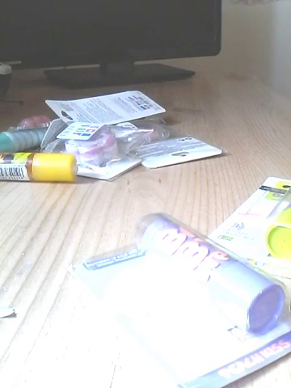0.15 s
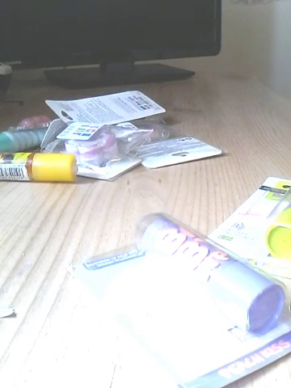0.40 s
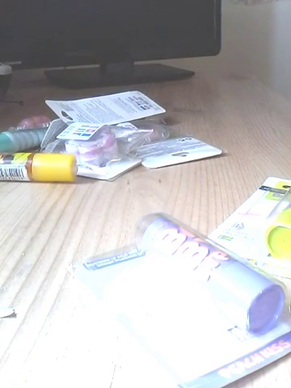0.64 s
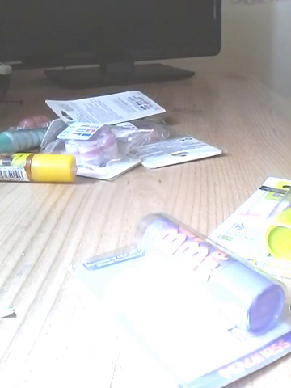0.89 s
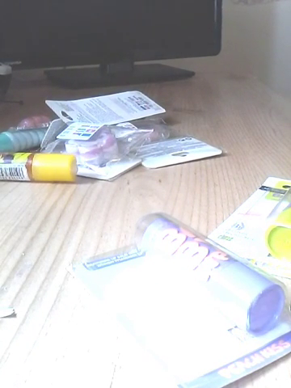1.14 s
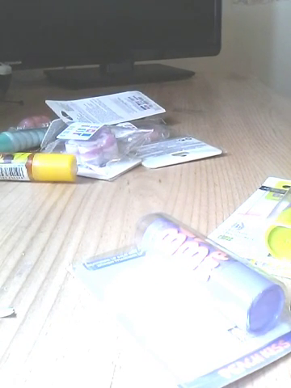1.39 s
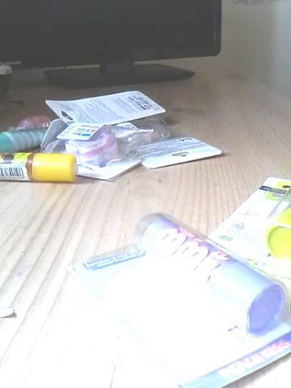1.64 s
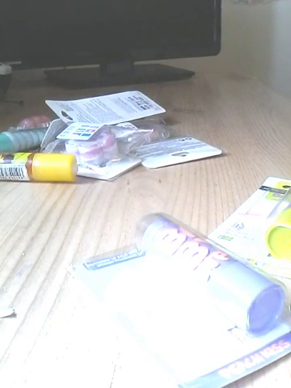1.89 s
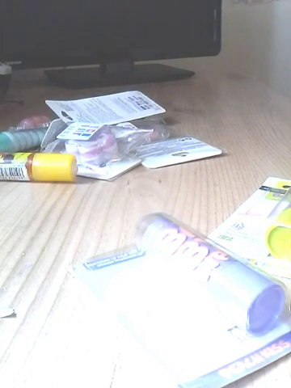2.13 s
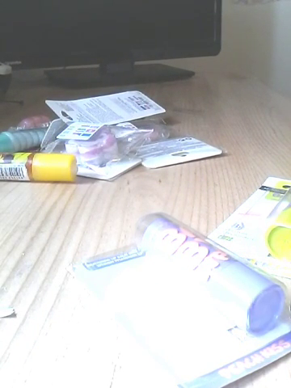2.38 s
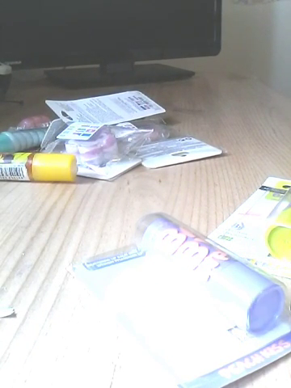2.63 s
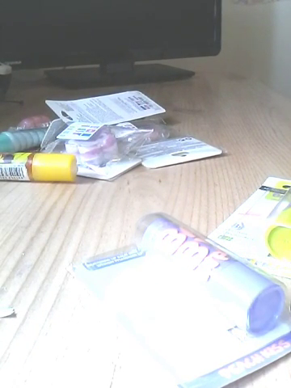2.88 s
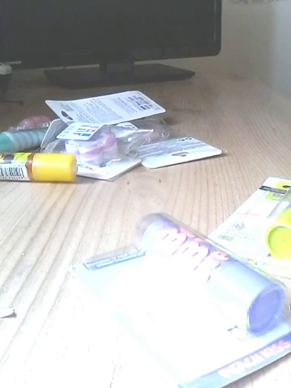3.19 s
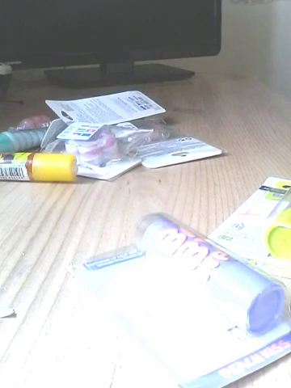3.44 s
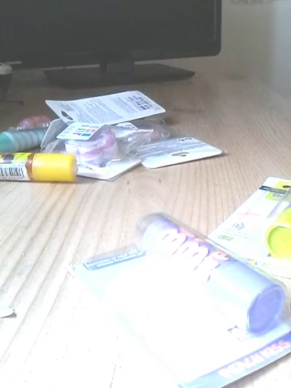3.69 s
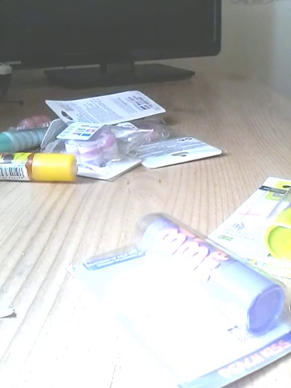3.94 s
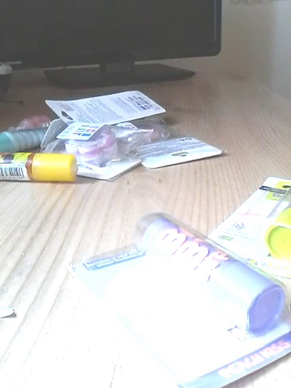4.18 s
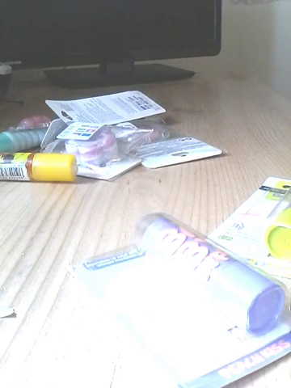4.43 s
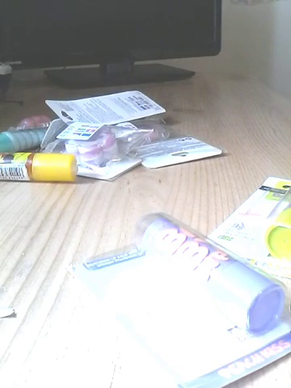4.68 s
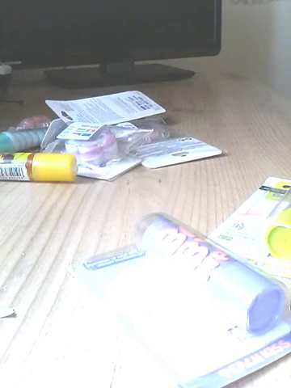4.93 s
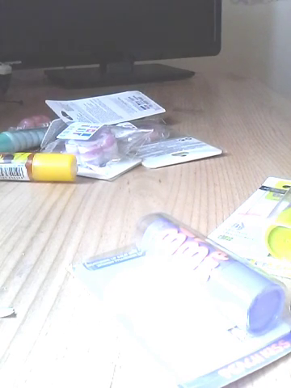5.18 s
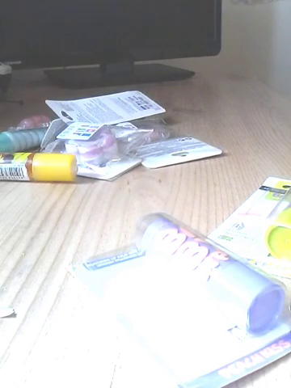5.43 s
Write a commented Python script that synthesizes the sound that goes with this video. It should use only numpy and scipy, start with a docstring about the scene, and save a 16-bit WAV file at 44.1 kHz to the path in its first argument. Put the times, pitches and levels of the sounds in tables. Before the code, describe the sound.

Stiff plastic and card packaging is handled close to the microphone on a wooden table. Crisp crinkles and low scrapes lead to a loud hollow knock at about one second. Bright snaps follow in clusters, thin out to near silence around four seconds, then a soft bump and more crackles end it. Small quiet room, short echoes.

```python
"""Blister packs on a wooden table

Stiff plastic blister packs on card are handled and pushed over a hollow wooden table, heard close up.
The plastic crinkles in clumps of tiny clicks with ringing hollows; short rattles make snaps and foil ticks.
Friction grains and soft strikes make the table top ring; short echoes and quiet room noise lie around it."""
import sys
import numpy as np
from scipy import signal
from scipy.fft import rfft, irfft
from scipy.io import wavfile

SR = 44100
rng = np.random.default_rng(int(sys.argv[2]) if len(sys.argv) > 2 else 0)


def nominal_scale(level):
    """Amplitude ratio for a level in decibels (scalar or array-like)."""
    x = np.asarray(level, float) / 20
    return 10 ** x


def int16_out(signal):
    """Quantize to a 16-bit WAV file."""
    q = np.round(np.clip(np.atleast_2d(signal).T, -1, 1) * 32767)
    wavfile.write(sys.argv[1], SR, q.astype(np.int16))


N = 245460   # length in samples

# knocks on the table: t/s, peak level/dB, strongest ring f/Hz, reach/octaves
KNOCK_EVENTS = [(.279, -36, 1200, 1.6), (0.648, -27.5, 219, 1.1), (0.912, -22, 201.5, 0.55),
                (.960, -25.5, 950, 0.62), (0.9621, -9.5, 530, 0.93), (0.9663, -6.5, 522, 0.7),
                (.967, -17, 145, 0.9), (.971, -13, 302, 0.94), (0.99, -15, 590, 5.2),
                (1.028, -22, 215, 0.77), (1.040, -19.5, 730, 0.5), (1.51, -38.5, 240, 1.2),
                (3.991, -54.5, 230, 1.12), (4.491, -53.5, 738, 0.92), (4.592, -30, 364, 0.35),
                (4.602, -29.5, 148, 1.1), (5.042, -23.5, 553, 1.1), (5.072, -24, 570, 0.7),
                (5.096, -30, 560, 0.53), (5.114, -37, 580, 1.3)]
# ringing modes of table top and card: f/Hz, relative level/dB, nominal 60 dB decay/s (each use scales it)
TABLE_MODES = [(113.8, -26.5, 0.15), (145, 4, 0.11), (229.8, 2, 0.066), (251.8, -3, 0.12), (344, 8, 0.041),
               (396.7, 2, 0.07), (522, 0.5, 0.061), (560, 11.5, 0.016), (772, -7, 0.24),
               (1060, -1.5, 0.0401), (1270, 2.5, 0.033), (1630, -24.5, 0.037)]
# tone colour of the stiff plastic: f/Hz, relative level/dB
PLASTIC_COLOUR = [(290, -48.5), (500, -21.5), (804, -7), (1270, -5), (1430, -22.5), (1630, -13.5),
                  (2140, -10), (2360, -4.5), (2850, -4.5), (4260, -12), (5130, -1), (6100, -4), (9120, -31),
                  (11300, -45), (15500, -57.5)]


def rms_one(x):
    """Scales a sound to an rms of 1."""
    return x / np.sqrt(np.mean(x ** 2) + 1e-20)


def in_time(rows, rise_db_per_s, fall_db_per_s, rest_db):
    """Each gesture swells, holds and fades; its other columns count as much as it sounds."""
    t = np.arange(0, N + 64, 64) / SR
    start, hold, db, *columns = np.transpose(rows)[:, :, None]
    # a gesture that opens within 12 ms of a knock starts almost at once
    jolted = np.abs(start - np.array(KNOCK_EVENTS)[:, 0]).min(1, keepdims=True) < .012
    rise = np.where(jolted, 2001.5, rise_db_per_s)
    level = db - rise * np.maximum(start - t, 0) - fall_db_per_s * np.maximum(t - start - hold, 0)
    power = nominal_scale(2 * np.maximum(level, -200))
    rest = nominal_scale(2 * rest_db)
    total = power.sum(0) + rest
    curves = [10 * np.log10(total)]
    for column in columns:
        curves.append(((column * power).sum(0) + np.median(column) * rest) / total)
    return [np.interp(np.arange(N) / SR, t, curve) for curve in curves]


def drift(rate_hz):
    """Slow random wander with an rms of 1: noise through a two-pole low-pass."""
    r = np.exp(-2 * np.pi * rate_hz / SR)
    noise = rng.standard_normal(N + SR)
    return rms_one(signal.lfilter([1], [1, -2 * r, r * r], noise)[SR:])   # skip the filter's start


def colour(x, spectrum):
    """Minimum-phase filter that follows a spectrum, so that nothing sounds early."""
    size = 4096
    hz, db = np.transpose(spectrum)
    grid = np.maximum(np.arange(size // 2 + 1), 1) * SR / size
    cepstrum = irfft(np.log(nominal_scale(np.interp(np.log(grid), np.log(hz), db))))
    # folding the cepstrum onto its first half gives minimum phase
    cepstrum[1:size // 2] *= 2
    cepstrum[size // 2 + 1:] = 0
    return signal.fftconvolve(x, irfft(np.exp(rfft(cepstrum))))[:N]


def ring(force, hz, t60):
    """A unit click sets a sine of height 1 ringing; it fades by 60 dB in t60 seconds."""
    r, w = nominal_scale(-60 / (t60 * SR)), 2 * np.pi * hz / SR
    return signal.lfilter([0, np.sin(w)], [1, -2 * r * np.cos(w), r * r], force + 1e-18)


def grains(per_s, spread_db, clump_db, clump_rate_hz):
    """Random clicks of uneven size that come in clumps; rms 1."""
    clumps = nominal_scale(clump_db * drift(clump_rate_hz))
    sizes = nominal_scale(spread_db * np.minimum(rng.exponential(1, N), 5)) * rng.choice([-1, 1], N)
    clicks = rng.random(N) < per_s / SR
    return rms_one(sizes * clumps * clicks)


def room_tone():
    """The quiet room: steady noise shaped by its spectrum."""
    # colour of the room noise: f/Hz, relative level/dB
    room_colour = [(18, -36), (30, 2.5), (108, 6.5), (187, 2.5), (316, 1.5), (432, -4), (547, 3.5),
                   (1520, -8.5), (5600, -17.5), (8290, -23), (15500, -24)]
    rms_db = -68.5
    return nominal_scale(rms_db) * rms_one(colour(rng.standard_normal(N), room_colour))


def echoes(x):
    """Near surfaces give back a short dense tail, here fading noise."""
    level_db, t60_s = -11, .15
    t = np.arange(round(.25 * SR)) / SR
    tail = rng.standard_normal(len(t)) * nominal_scale(-60 * t / t60_s) * (t > .002)
    return nominal_scale(level_db) * signal.fftconvolve(x, tail / np.sqrt(np.sum(tail ** 2)))[:N]


def drag():
    """Friction shakes the table modes: the low one nearest the push's pitch hums, the upper by its share."""
    # pushes of the card: t/s, hold/s, rumble level/dB (lowered below for each group of modes),
    # share of upper modes level/dB, strongest low mode f/Hz
    pushes = [(.27, 0.024, -47.5, 2, 175), (.53, 0.015, -31.5, -6, 178), (.6, 0.007, -37.5, -13, 159),
              (.65, 0.17, -36, -0.5, 170), (.75, 0.038, -52, 8, 200), (.81, 0.091, -33.5, -1.5, 187),
              (.9, 0.091, -25.5, -2, 204), (.965, 0.013, -16.5, 9.5, 190), (1.02, 0.038, -33, 6.5, 230),
              (1.1, .04, -45.5, 3, 240), (1.24, 0.19, -37, -0.5, 208), (1.51, 0.018, -29, -12.5, 203),
              (1.58, 0.05, -42, -7, 207), (1.68, 0.024, -61, 0, 206), (1.86, 0.03, -43.5, -26, 159),
              (2.08, 0.028, -43, -1.5, 208), (2.32, 0.048, -54.5, 2.5, 170), (2.46, 0.017, -61, 8, 232),
              (2.74, 0.063, -54, -9, 172), (2.87, 0.064, -53, -20, 151), (3.18, 0.026, -61, 3.5, 206),
              (3.31, 0.067, -59, 2, 150), (3.93, .08, -70.5, 9, 194), (4.59, 0.038, -28, -5, 165.1),
              (4.65, 0.046, -39, -7.5, 170), (4.72, 0.052, -48.5, -13, 172), (4.86, .07, -49.5, -2, 176),
              (5.04, .02, -32.5, -0.5, 186), (5.08, 0.018, -41, 1.5, 189), (5.22, .07, -44, -12, 155),
              (5.34, 0.088, -44, -4, 184), (5.54, 0.023, -66, 13, 238)]
    rumble_db, upper_db, hum_hz = in_time(pushes, rise_db_per_s=344.5, fall_db_per_s=300.0, rest_db=-77)
    rub = grains(per_s=2500, spread_db=5.5, clump_db=2.0, clump_rate_hz=28)
    low, upper = 0, 0
    for hz, db, t60 in TABLE_MODES:
        if hz < 300:
            octaves_off = abs(np.log2(hz / hum_hz))
            near = nominal_scale(rumble_db - 3.5 - 30.0 * octaves_off)
            low = low + near * rms_one(ring(ring(rub, hz, 2.2 * t60), hz, 0.2 * t60))
        else:
            # longer and higher rings are scaled down
            upper = upper + nominal_scale(db) * ring(ring(rub, hz, 1.2 * t60), hz, 0.23 * t60) / (hz * t60)
    return low + nominal_scale(rumble_db + upper_db - 8.5) * rms_one(upper)


def knocks():
    """Each soft contact strikes all table modes, most those near its own ring; a resting hand damps them."""
    ring_share = .75   # share of the nominal decay time left under the hand
    landing_s, landing_rough = .004, .05   # fade time and size of the uneven force
    out, size = np.zeros(N), round(.3 * SR)
    t = np.arange(size) / SR
    chance = rng.standard_normal((len(KNOCK_EVENTS), size))
    for (s, peak_db, ring_hz, octaves), rough in zip(KNOCK_EVENTS, chance):
        push = t * ring_hz * np.exp(-6.0 * t * ring_hz)   # one soft push, short for a high ring
        landing = landing_rough * rough * np.exp(-t / landing_s)
        # the contact spot couples to modes near its ring
        band = [ring_hz / 2 ** octaves, ring_hz * 2 ** octaves]
        reach = signal.butter(2, band, "band", fs=SR, output="sos")
        force = signal.sosfilt(reach, push + landing)
        sound = 0
        for hz, db, t60 in TABLE_MODES:
            gain = nominal_scale(db - 20 * abs(np.log2(hz / ring_hz)) / octaves)
            sound = sound + gain * ring(force, hz, ring_share * t60)
        at = round(s * SR)
        out[at:at + size] += (nominal_scale(peak_db) * sound / np.abs(sound).max())[:N - at]
    return out


def handling():
    """The hand squeezes and shifts the packs: crinkle level, card share and foil share over time."""
    # squeezes: t/s, hold/s, crinkle level/dB, card rustle level/dB above it, foil sheen level/dB above it
    # (the crinkle uses both shares only as swings around their middle value)
    squeezes = [(0.0, .04, -51, -14.5, -21.5), (.07, .06, -62, -21.5, -28.5),
                (.17, 0.17, -47.5, -11, -28.5), (.3, 0.069, -49, 1, -33.5), (.4, .04, -47, -9, -23),
                (.46, .04, -46.5, -3.5, -26.5), (.53, .04, -51, -12.5, -32), (.6, .1, -40, -13.5, -13),
                (.74, 0.12, -50, -2, -15), (.87, 0.078, -48.5, 15, -38), (.958, 0.036, -30.5, 8.5, -19.5),
                (1.02, .05, -40, 5.5, -6), (1.09, .03, -47, 2, -17.5), (1.14, .05, -50, -5, -7.5),
                (1.25, .17, -53.5, 10, 0), (1.45, 0.088, -45, -9.5, -13), (1.59, .06, -58, -12, -15),
                (1.78, 0.13, -45.5, -9.5, -19), (1.93, 0.061, -39.5, -9.5, -7), (2.05, .09, -39, -8, -8),
                (2.2, .06, -61, -20.5, -26), (2.29, 0.018, -43.5, -10, -18.5),
                (2.38, 0.068, -42.5, -10, -11), (2.49, .17, -47, -15.5, -31),
                (2.68, 0.016, -51, -25, -12.5), (2.73, .06, -38, -17, -18), (2.81, 0.044, -37.5, -7.5, -6),
                (2.88, .05, -44.5, -10.5, -22), (2.95, .04, -51, -7, -23.5), (3.02, .05, -55, -11, -18.5),
                (3.09, .04, -66.5, -11.5, -22), (3.16, 0.042, -56.5, -3.5, -15.5),
                (3.25, .14, -47, -7.5, -19.5), (3.42, 0.093, -56.5, -9, -21), (3.56, .12, -71, -5.5, -25.5),
                (3.72, .09, -62, -4, -16.5), (3.85, .2, -65.5, -3.5, -24), (4.07, .07, -69.5, -5.5, -21),
                (4.24, 0.46, -73, -5.5, -21.5), (4.5, 0.19, -57.5, -6, -18), (4.61, .15, -41, -11.5, -11.5),
                (4.79, .03, -52, -7.5, -28.5), (4.87, .06, -46.5, -10, -24), (4.95, .03, -62, -9.5, -31),
                (5.04, 0.041, -53.5, 2.5, -29), (5.09, 0.0236, -53.5, 3, -22),
                (5.19, .01, -56.5, -8, -18.5), (5.23, .15, -41.5, -7, -15.5),
                (5.43, .14, -41.5, -7.5, -28.5)]
    # the packs still settle at rest
    return in_time(squeezes, rise_db_per_s=307, fall_db_per_s=290.0, rest_db=-76.0)


def small_snaps(count, strength_db, centre_hz):
    """Random rows like those of the loud snaps and ticks, as strong as the handling at their moment."""
    s = rng.uniform(.01, N / SR - .01, count)
    size, pitch = rng.standard_normal((2, count))
    db = strength_db[(s * SR).astype(int)] + 3.0 * size   # spread 3 dB
    return list(zip(s, db, centre_hz * 2 ** (.2 * pitch)))   # spread 0.2 octaves


def rattles(events, spectrum, fast_s, slow_s, cycles, broad):
    """A snap is a short rattle of the sheet: a brief ring at its own pitch and a broad crack."""
    size = 1024
    t, out = np.arange(size) / SR, np.zeros(N + size)
    swell = (t / .003) ** 3 / (1 + (t / .003) ** 3)   # the fold creaks up to its break
    shape = swell * (np.exp(-t / fast_s) + 0.11 * np.exp(-t / slow_s))
    for (s, strength_db, hz), noise in zip(events, rng.standard_normal((len(events), size))):
        tone = ring(ring(noise * shape, hz, cycles / hz), hz, 1.0 / hz)
        crack = colour(noise * shape, spectrum)[:size]
        small_fold = signal.butter(1, 0.9 * hz, "high", fs=SR, output="sos")   # small folds lack depth
        crack = signal.sosfilt(small_fold, crack)
        burst = tone / np.abs(tone).max() + broad * crack / np.abs(crack).max()
        at = round((s - .002) * SR)   # the swell leads up to the event
        out[at:at + size] += nominal_scale(strength_db - 5.0) * burst / np.abs(burst).max()
    return out[:N]


def snaps():
    """The stiff sheet snaps in the presence range, the thin foil ticks above it."""
    # loud plastic snaps: t/s, strength level/dB (peak lies 5 dB lower before the filter), pitch f/Hz
    loud_snaps = [(0.1535, -32.5, 4200), (0.2673, -32, 5330), (0.408, -24.5, 5000), (0.4563, -25, 5630),
                  (0.4868, -24, 5840), (0.5642, -25.5, 5950), (0.5924, -25, 5000), (0.6285, -22, 5020),
                  (0.669, -16, 5300), (0.6992, -39, 4820), (0.752, -25.5, 5340), (0.7746, -25, 5650),
                  (0.7904, -24, 6080), (0.8061, -22.5, 5800), (0.831, -25.5, 5100), (0.883, -28, 1510),
                  (0.9572, -12, 2140), (1.0587, -24, 5250), (1.1358, -33, 5400), (1.1493, -26.5, 5200),
                  (1.168, -16.5, 5040), (1.1867, -23, 4970), (1.2665, -29, 5050), (1.406, -37, 5760),
                  (1.4198, -23, 6050), (1.48, -35, 5700), (1.5199, -20, 5650), (1.719, -38, 3490),
                  (1.7509, -53.5, 5300), (1.7664, -32, 5200), (1.7918, -26, 5770), (1.8537, -27, 2390),
                  (1.8985, -21, 6230), (1.931, -22, 1860), (1.955, -22.5, 5040), (1.9924, -33, 5390),
                  (2.0123, -21, 5100), (2.0613, -15, 6050), (2.1041, -18.5, 5450), (2.2233, -33, 5000),
                  (2.3364, -24, 5200), (2.4095, -15.5, 5570), (2.4409, -30, 2360), (2.546, -26, 5130),
                  (2.5646, -38, 5140), (2.599, -25.5, 5070), (2.6564, -32, 5120), (2.679, -24.5, 6020),
                  (2.715, -30, 5900), (2.7276, -19.5, 5340), (2.7655, -19.5, 5330), (2.822, -15, 5250),
                  (2.8462, -13, 5500), (2.9746, -27, 5300), (3.026, -28.5, 6000), (3.0552, -33, 2450),
                  (3.153, -36.5, 3020), (3.249, -32.5, 5000), (3.2515, -18, 4550), (3.2842, -19, 5260),
                  (3.3049, -30, 3960), (3.3176, -20, 5250), (3.5015, -26.5, 5410), (3.5197, -35, 5240),
                  (3.6795, -44.5, 4890), (3.7623, -49.5, 5940), (3.7634, -25, 6253), (4.569, -35, 6130),
                  (4.6044, -25, 6000), (4.6086, -29, 5360), (4.7212, -45, 5900), (4.7561, -29, 5350),
                  (4.83, -28.5, 5330), (4.8783, -26.5, 5400), (4.9077, -28.5, 5980), (5.0365, -44.5, 5950),
                  (5.05, -29.5, 5570), (5.0943, -29, 1890), (5.212, -34, 6020), (5.2195, -28, 5390),
                  (5.3485, -20, 6200), (5.4005, -23.5, 4750), (5.433, -25, 6030), (5.4565, -28, 2320)]
    # thin-foil ticks, same columns: t/s, strength level/dB, pitch f/Hz
    loud_ticks = [(0.156, -50, 9370), (0.4095, -43, 8300), (0.5646, -63, 8420), (0.5876, -46, 8400),
                  (0.6165, -36.5, 8460), (0.627, -34, 8200), (0.6978, -51.5, 9400), (0.7513, -53.5, 9400),
                  (0.8819, -54.5, 9140), (0.9642, -46, 8300), (1.06, -35, 8900), (1.1353, -43, 9770),
                  (1.1642, -36, 10400), (1.2276, -47, 10200), (1.265, -40, 10600), (1.286, -39.5, 9550),
                  (1.296, -37, 9700), (1.3314, -38.5, 10000), (1.479, -33.5, 8700), (1.717, -49, 8260),
                  (1.7509, -65, 9210), (1.956, -33, 10200), (1.995, -31, 8200), (2.0527, -63, 8910),
                  (2.0657, -28, 8100), (2.1894, -58, 8850), (2.2992, -42.5, 11200), (2.406, -38, 10670),
                  (2.5446, -51, 10500), (2.679, -38, 10400), (2.7192, -42.5, 8590), (2.845, -37, 11100),
                  (2.9744, -64.5, 8480), (3.24, -64, 8450), (3.2525, -48, 11200), (3.2847, -42.5, 9780),
                  (3.7623, -68, 8250), (4.6034, -38, 8200), (4.609, -34.5, 8300), (4.7566, -53, 8700),
                  (5.188, -45, 8330), (5.3453, -31, 8400)]
    # tone colour of the foil: f/Hz, relative level/dB
    foil_colour = [(4120, -35.5), (7000, -4), (8160, -11.5), (9480, -9.5), (11400, -19), (13700, -14),
                   (15500, -36.5)]
    level_db, _, sheen_db = handling()
    sheen_db = 0.39 * (sheen_db - np.median(sheen_db))   # small ticks follow part of the sheen's swing
    stiff_events = [*loud_snaps, *small_snaps(330, level_db + 14.0, 5400.0)]
    foil_events = [*loud_ticks, *small_snaps(300, level_db + sheen_db - 10, 9500)]
    stiff = rattles(stiff_events, PLASTIC_COLOUR, fast_s=.0015, slow_s=0.0033, cycles=26.0, broad=.55)
    foil = rattles(foil_events, foil_colour, fast_s=0.00022, slow_s=0.0061, cycles=40.0, broad=0.53)
    dull = signal.butter(3, [700, 7500], "band", fs=SR, output="sos")
    bright = signal.butter(3, 7800, "high", fs=SR, output="sos")
    return signal.sosfilt(dull, stiff) + signal.sosfilt(bright, foil)


def hollow_rings(buckles, card_db, sheen_db):
    """Tiny buckles set the hollows of blisters and card ringing; the grip picks which low one sounds."""
    # hollows: f/Hz, nominal width/Hz (sets the decay times), relative level/dB
    hollows = [(943, 220, -4.5), (1302, 75, -12), (1686, 63, -4.5), (1994, 650, 2.5), (2296, 77, -1.5),
               (2567, 100, -2.5), (3112, 120, -12.5), (4030, 960, 11), (4300, 130, -9.5), (5200, 340, 16.5),
               (5950, 230, 8.5), (6940, 120, -21), (8850, 220, -29), (10200, 92, -28), (11300, 290, -15.5)]
    # low hollow picked by the grip: t/s, f/Hz
    grip = [(0.0, 1940), (0.22, 1900), (0.29, 1540), (0.37, 2000), (0.43, 1500), (0.48, 2080), (0.84, 1800),
            (0.9, 1270), (1.16, 1980), (1.3, 1200), (1.39, 1270), (1.46, 2210), (1.53, 2450), (1.63, 1720),
            (1.81, 2450), (1.91, 1940), (2.23, 2540), (2.42, 2100), (3.08, 2364), (3.21, 1614),
            (3.29, 2080), (3.91, 2230), (4.0, 1810), (4.37, 1730), (4.7, 2210), (5.13, 1630), (5.19, 2500),
            (5.57, 2100)]
    grip_hz = np.interp(np.arange(N) / SR, *np.transpose(grip))
    out = 0
    for hz, width_hz, db in hollows:
        held_db = 0
        if hz < 2800:
            off_grip_db = np.minimum(30.0 * abs(np.log2(hz / grip_hz)), 9.0)
            held_db = card_db * (1 if hz < 1500 else .45) - off_grip_db + 15.5
        elif hz > 8000:
            held_db = sheen_db
        twice = ring(ring(buckles, hz, 1.6 / width_hz), hz, 2.5 / width_hz)   # steep skirts
        wander_db = 4 * drift(9)
        out = out + nominal_scale(db + held_db + wander_db) * rms_one(twice)
    return rms_one(out)


def crinkle():
    """Tiny buckles in third-octave regions of the sheet, and the hollows that they set ringing."""
    level_db, card_db, sheen_db = handling()
    card_db, sheen_db = card_db - np.median(card_db), sheen_db - np.median(sheen_db)
    buckles = [grains(per_s=3500, spread_db=4.0, clump_db=2.5, clump_rate_hz=35) for _ in range(2)]
    # the foil crackles in stronger, slower clumps
    foil = grains(per_s=7000, spread_db=6.5, clump_db=11.0, clump_rate_hz=11)
    edges, regions = np.geomspace(480, 16000, 16), 0
    for k, (low, high) in enumerate(zip(edges, edges[1:])):
        log_hz = np.log(low * high) / 2
        card_share = np.interp(log_hz, np.log([1250, 2000, 4200]), [1, .45, 0])
        sheen_share = np.interp(log_hz, np.log([7000, 10000]), [0, 1])
        wander_db = 0.48 * drift(11.0)   # regions wake and rest
        gain = nominal_scale(card_share * card_db + sheen_share * sheen_db + wander_db)
        sheet = buckles[0] + 0.56 * buckles[1] * (-1) ** k   # neighbouring regions differ
        mixed = (1 - .8 * sheen_share) * sheet + 2.5 * sheen_share * foil   # foil replaces sheet up high
        band = signal.butter(2, [low, high], "band", fs=SR, output="sos")
        regions = regions + signal.sosfilt(band, gain * mixed)
    sheet_sound = rms_one(colour(regions, PLASTIC_COLOUR))
    hollow_sound = nominal_scale(-3.0) * hollow_rings(buckles[1], card_db, sheen_db)
    return nominal_scale(level_db + 0.5) * (sheet_sound + hollow_sound)


def scene():
    """Packs, table and the quiet room; the table radiates little deep bass."""
    room = room_tone()
    no_deep_bass = signal.butter(4, 90, "high", fs=SR, output="sos")
    table = signal.sosfilt(no_deep_bass, drag() + knocks())
    plastic = snaps() + crinkle()
    tail = echoes(plastic + .35 * table)   # the table feeds the echoes less
    return (plastic + table + tail + room)[None]


def low_pass(x):
    """Removes everything above the highest recorded frequency."""
    return signal.sosfilt(signal.butter(12, 15680, fs=SR, output="sos"), x)


def record(dry):
    """Turns the finished mix into the final sound."""
    return low_pass(dry)


dry = scene()
out = record(dry)
int16_out(out)
```